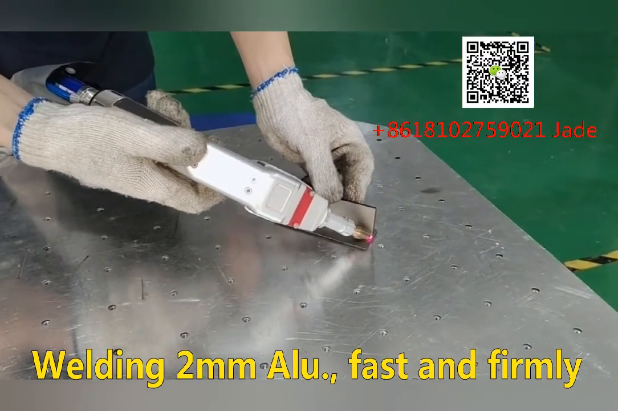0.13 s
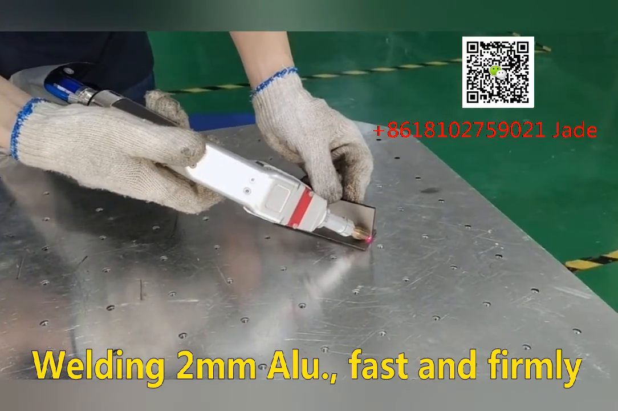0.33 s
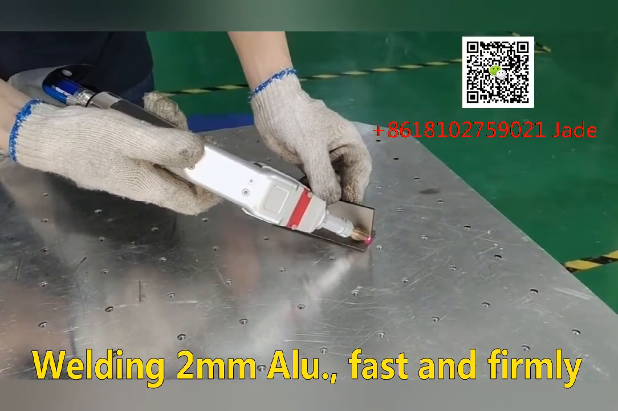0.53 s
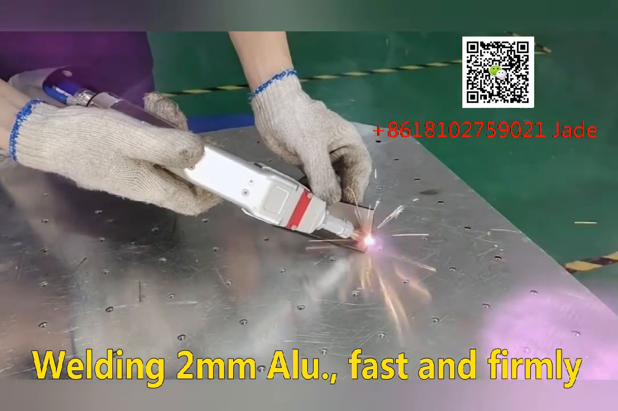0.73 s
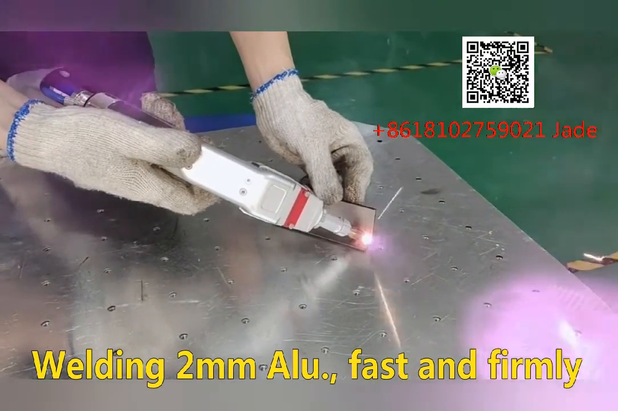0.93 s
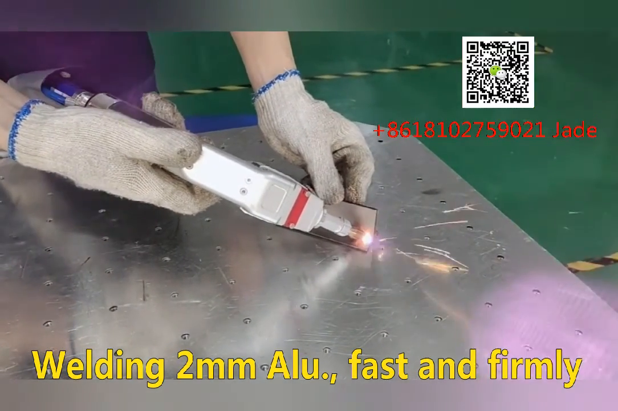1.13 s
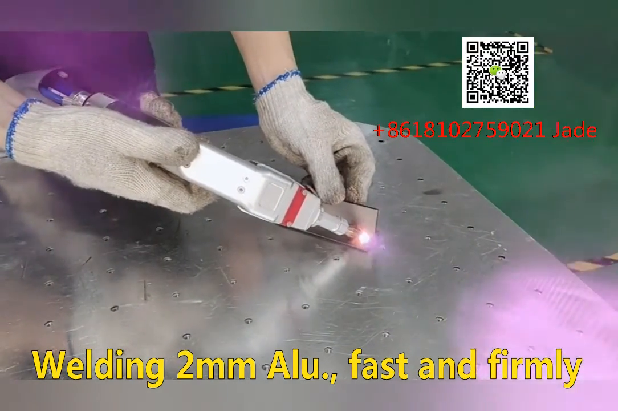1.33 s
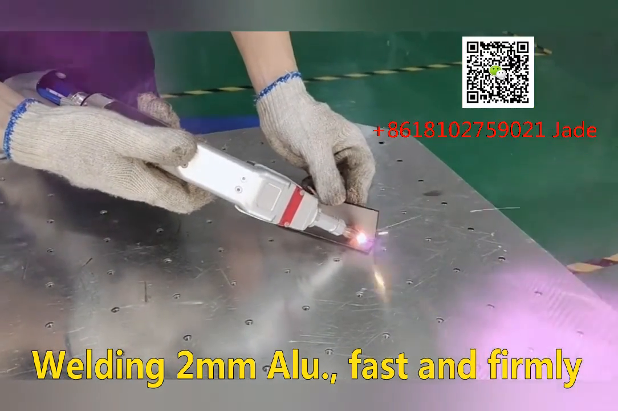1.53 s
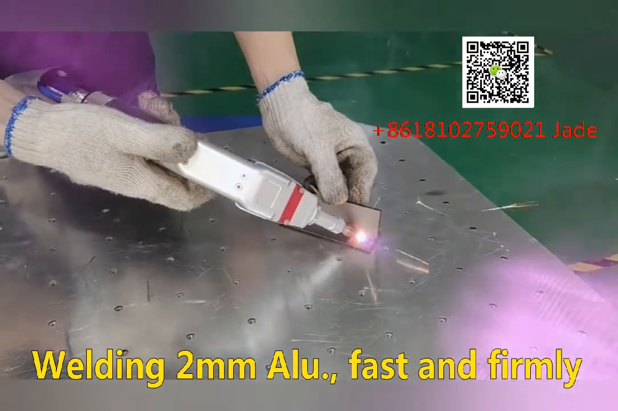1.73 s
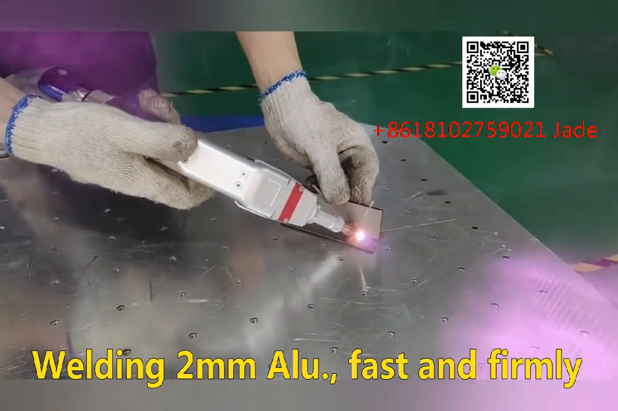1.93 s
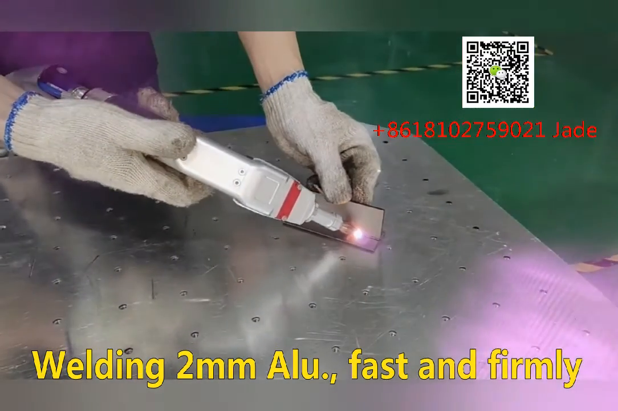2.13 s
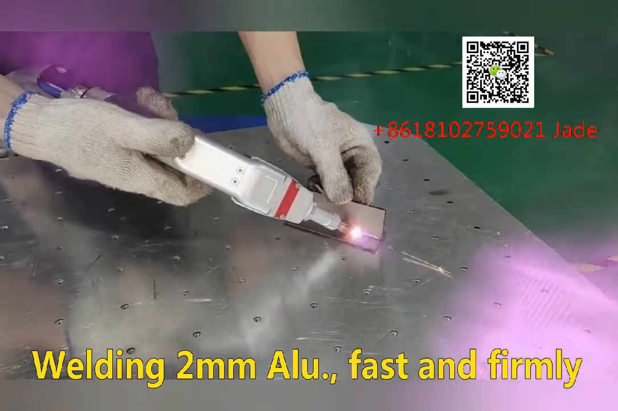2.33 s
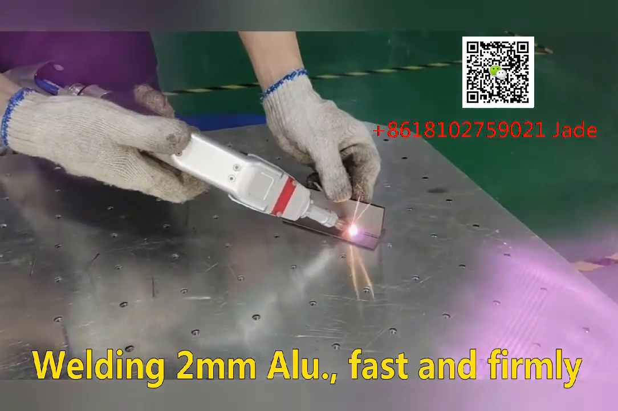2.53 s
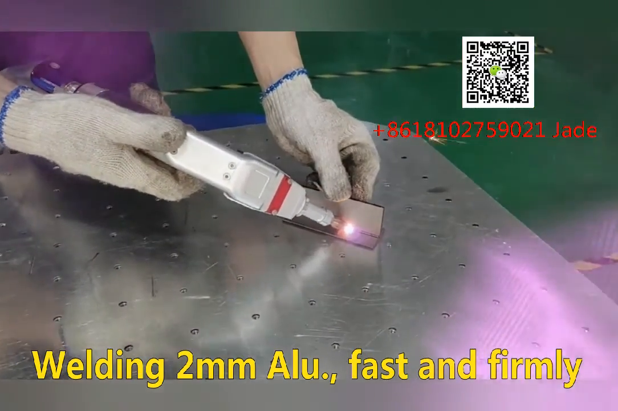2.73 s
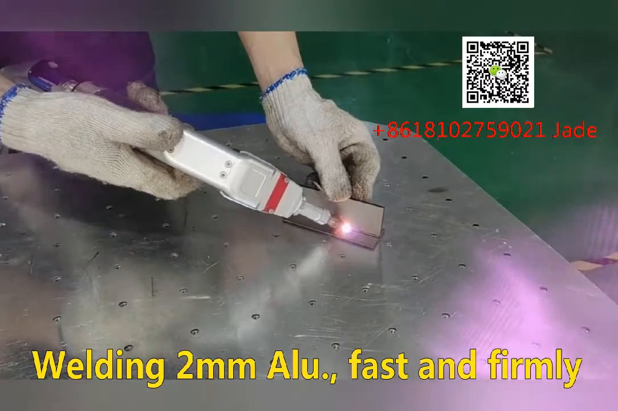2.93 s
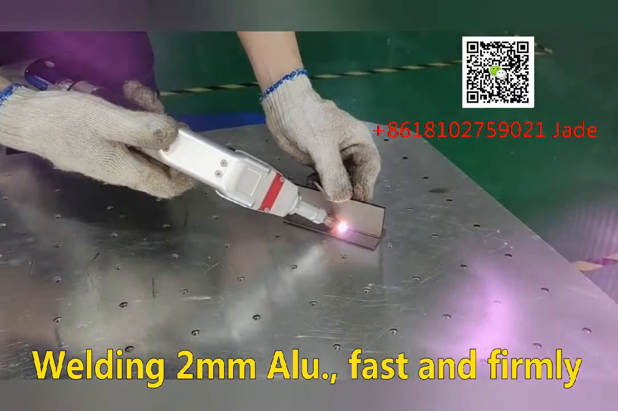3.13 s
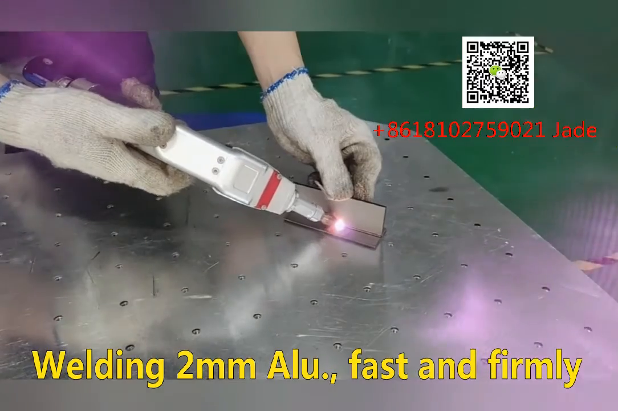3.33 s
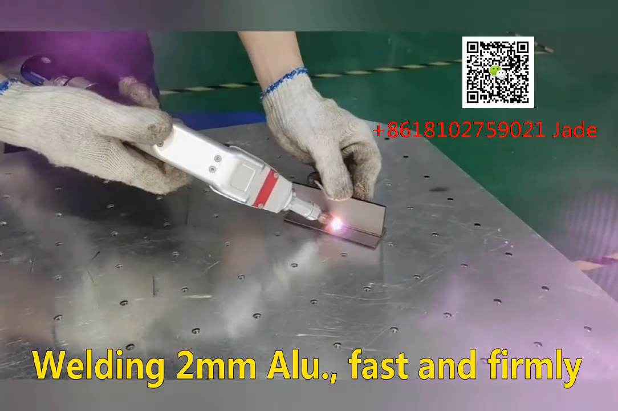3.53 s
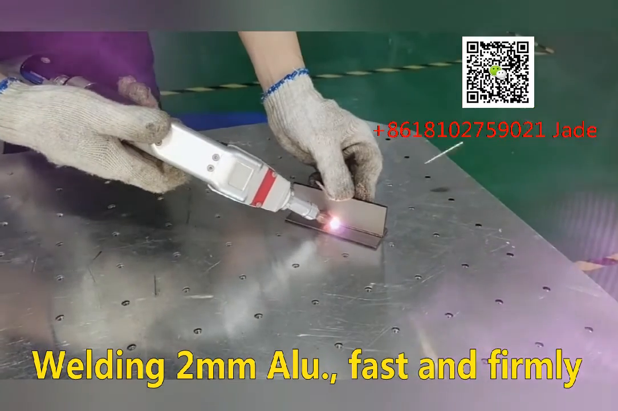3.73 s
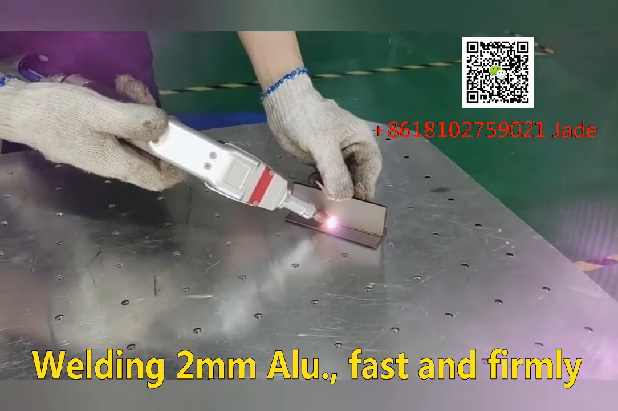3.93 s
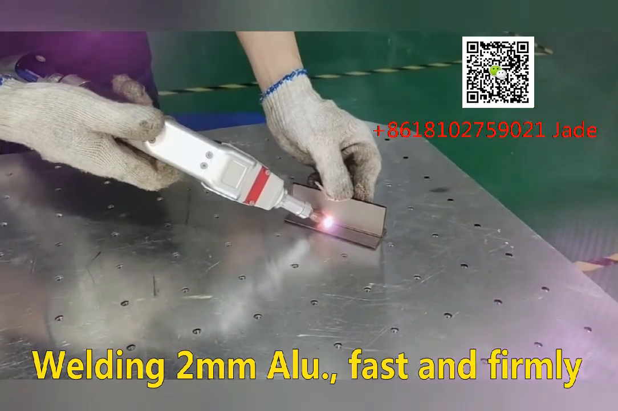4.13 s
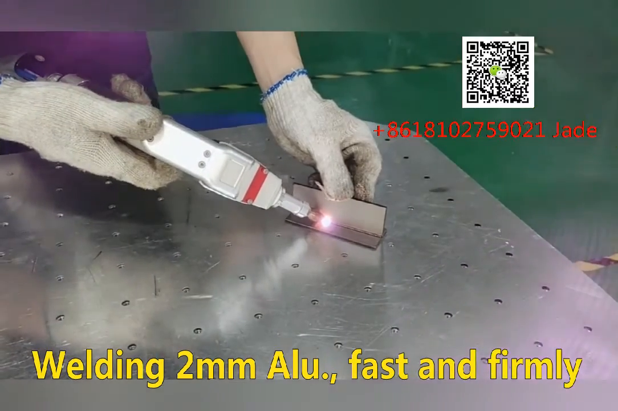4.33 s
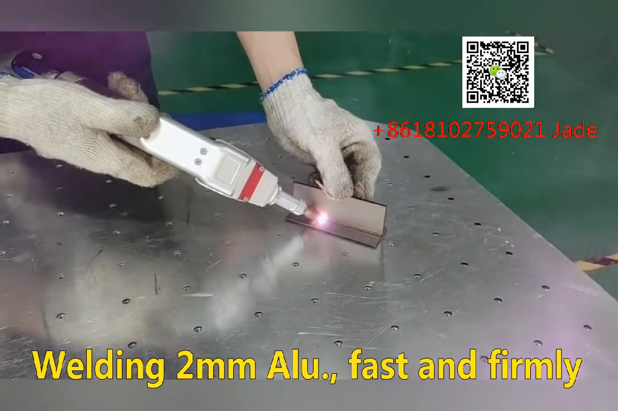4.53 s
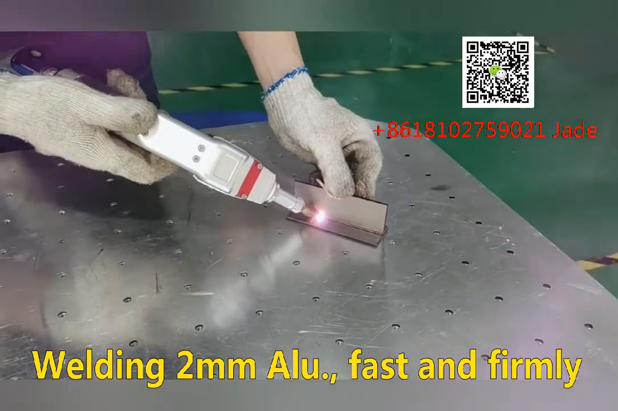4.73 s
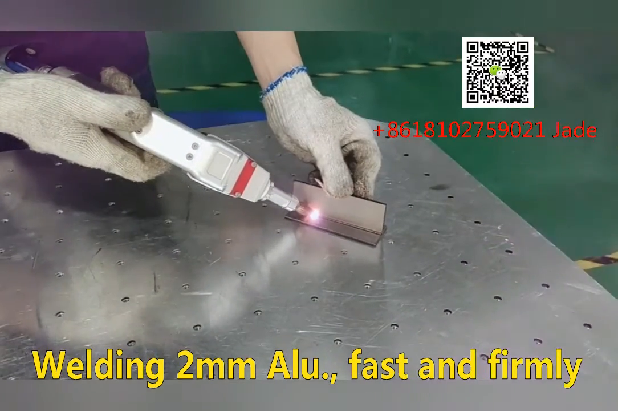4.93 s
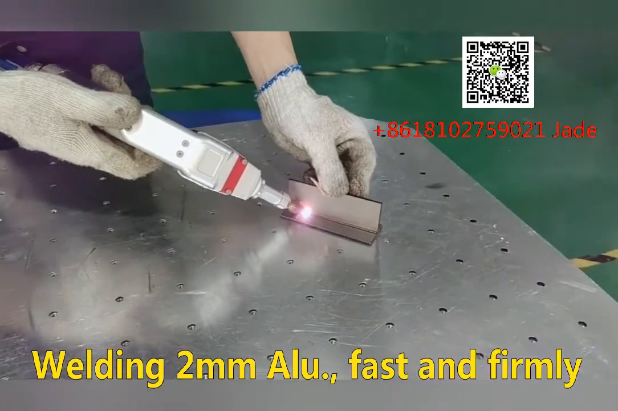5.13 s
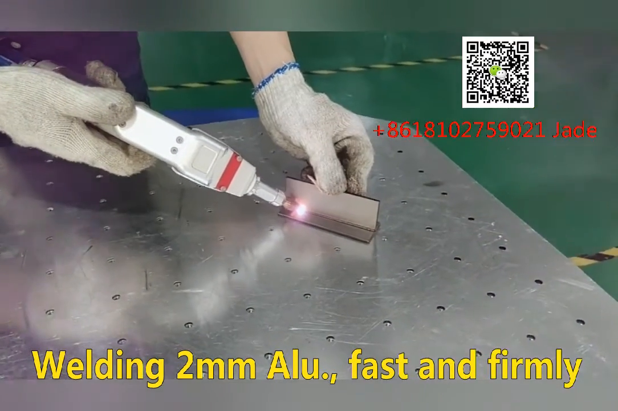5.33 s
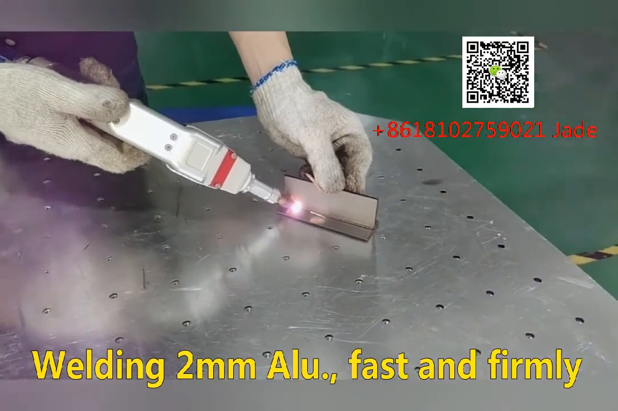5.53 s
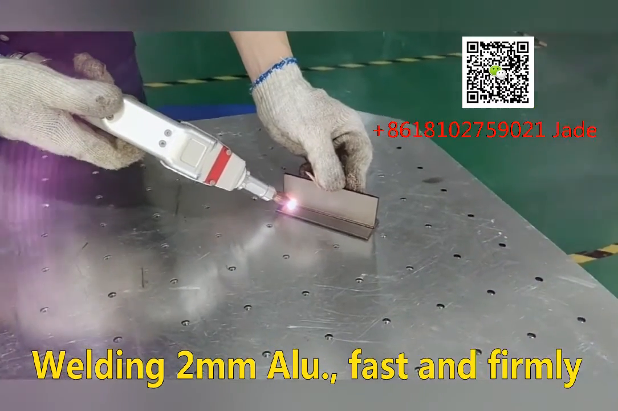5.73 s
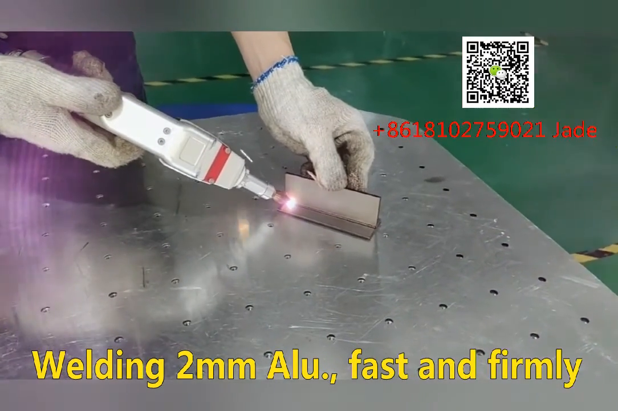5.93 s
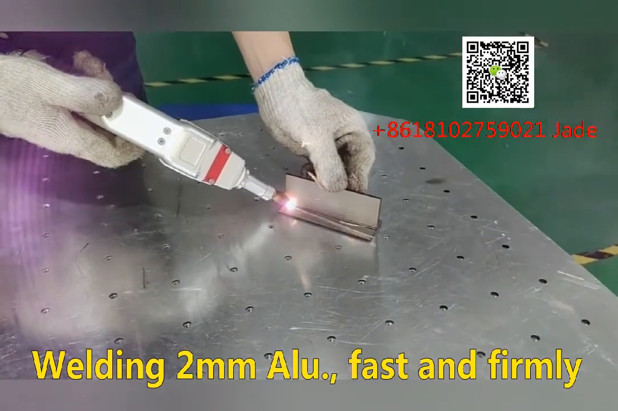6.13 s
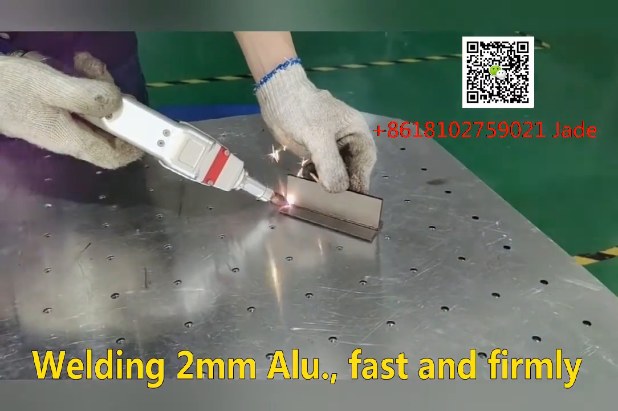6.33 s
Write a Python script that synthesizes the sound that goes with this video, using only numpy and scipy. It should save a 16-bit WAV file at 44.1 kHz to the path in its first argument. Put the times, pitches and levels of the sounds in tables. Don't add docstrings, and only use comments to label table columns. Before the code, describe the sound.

Close-up in a humming workshop with faint distant thuds. A valve snaps open and gas hisses through a small nozzle, then a relay ticks and a sharp crack starts the weld. A loud, bright, raspy hiss flutters about eighty times a second, with a thin high whistle inside. At the end a dull knock, a brief flare and freely blowing gas shudder on the steel table.

```python
import sys
import numpy as np
from scipy import signal
from scipy.fft import rfft, irfft, next_fast_len
from scipy.io import wavfile
from scipy.ndimage import uniform_filter1d, map_coordinates

SR = 44100
rng = np.random.default_rng(int(sys.argv[2]) if len(sys.argv) > 2 else 0)


def wav_record(signal):
    frames = np.transpose(np.atleast_2d(signal))
    bounded = np.clip(frames, -1, 1)
    quanta = np.round(bounded * 32767).astype(np.int16)
    wavfile.write(sys.argv[1], SR, quanta)


def convert_level_to_amplitude(level_db):
    exponent = np.asarray(level_db, float) / 20
    return 10 ** exponent


N = 281562
TIME = np.arange(N) / SR
SIZE = next_fast_len(N + 4096)
HZ = np.maximum(np.fft.rfftfreq(SIZE, 1 / SR), 1)

STRIKE_S = 0.5555
SHIELDED_S = 0.11
LULL_S, LULL_WIDTH_S = 6.01, 0.14
LIFT_S, LIFT_TAKES_S = 6.218, 0.0054


def rms_one(x):
    return x / np.sqrt(np.mean(x ** 2) + 1e-20)


def in_time(rows):
    s, *columns = np.transpose(rows)
    return [np.interp(TIME, s, c) for c in columns]


def at_hz(points, hz=HZ):
    points = np.array(points)
    return np.interp(np.log(hz), np.log(points[:, 0]), points[:, 1])


def shape(x, response):
    return irfft(rfft(x, SIZE) * response, SIZE)[..., :N]


def step(s, takes):
    return 0.5 + 0.5 * np.tanh((TIME - s) / takes)


def since(s):
    return np.maximum(TIME - s, 0)


def drift(rate):
    r = np.exp(-40 * np.pi * rate / SR)
    noise = rng.standard_normal(N // 20 + 2002)
    slow = signal.lfilter([1], [1, -2 * r, r * r], noise)[2000:]
    return np.interp(np.arange(N) / 20, np.arange(len(slow)), rms_one(slow))


def warble(hz, width_hz, steady=0):
    turn = 2 * np.pi * np.cumsum(hz * np.ones(N)) / SR
    tone = (steady + drift(width_hz)) * np.cos(turn) + drift(width_hz) * np.sin(turn)
    return tone / np.sqrt(1 + steady ** 2 / 2)


# (frequency [Hz], level [dB])
LEFT_PORT = [(890, -27.5), (1130, -21), (1650, -19.5), (1850, -16.5), (3300, -7.5), (4500, -1), (5200, -5),
             (5600, -9.5), (6400, -14.5), (7400, -22.5), (8500, -34), (10050, -29), (11000, -12),
             (15300, -12.5)]
RIGHT_PORT = [(890, -28), (1130, -21), (1650, -22.5), (1850, -14), (2800, -13.5), (3400, -15), (5400, -16),
              (6100, -6.5), (6450, -0.5), (7000, -6.5), (8200, -10.5), (12500, -8.5), (13900, -9),
              (14900, -6.5)]
# (frequency [Hz], lead [rad])
LEAD = [(0, -0.5), (2840, 0.5), (3100, 0), (3450, 6), (3700, 5), (5340, 3), (6370, 2.5), (8010, 2.5),
        (8960, 3.5), (9650, 3.2), (11600, -1.2), (12100, -1.5), (14600, -1), (16400, 7)]
# (delay [s], level [dB])
TABLE_ECHO = [(.000976, -14), (.000976, -10)]


def ports():
    fold = irfft(np.log(convert_level_to_amplitude(at_hz(LEFT_PORT))), SIZE)
    fold[SIZE // 2:] = 0
    phase = 2 * rfft(fold).imag
    lead = np.interp(HZ, *np.transpose(LEAD))
    sheen = 1 / (1 + (7000 / HZ) ** 4)
    echo = [1 - sheen * convert_level_to_amplitude(db) * np.exp(-2j * np.pi * HZ * s) for s, db in TABLE_ECHO]
    rumble_cut = np.minimum(HZ / 700, 1) ** 2
    left = convert_level_to_amplitude(at_hz(LEFT_PORT)) * np.exp(1j * phase)
    right = convert_level_to_amplitude(at_hz(RIGHT_PORT)) * np.exp(1j * (phase - lead))
    return np.array([left * echo[0], right * echo[1]]) * rumble_cut


PORTS = ports()

# (frequency [Hz], likeness [0-1])
ALIKE = [(900, 0.27), (1900, 0.93), (2600, 0.95), (3250, 0.38), (3700, 0.61), (5200, 0.28), (5900, 0.92),
         (6400, 0.74), (7700, 0.59), (11000, 0.16), (12000, 0.78), (13500, 0.39)]
# (time [s], extra lag of the left port [samples])
TRAVEL = [(.5, -0.31), (6.38, 1.75)]


def heard(direct, scattered, band):
    alike = np.clip(at_hz(ALIKE), 0, 1)
    left, right = PORTS * band
    lag, = in_time(TRAVEL)
    near = map_coordinates(shape(direct, right * alike), [np.arange(N) + lag], order=3)
    far = shape(scattered, right * np.sqrt(1 - alike ** 2))
    return np.array([shape(direct, left), near + far])


# (frequency [Hz], width [Hz], level [dB])
NOZZLE = [(2870, 250, 13), (4560, 590, 3.5), (6630, 400, 4), (9370, 200, 1), (11950, 660, -5)]


def nozzle():
    return 0.76 + sum(convert_level_to_amplitude(db) / (1 + 2j * (HZ - hz) / width) for hz, width, db in NOZZLE)


# (time [s], level [dB])
THUDS = [(.39, -39.5), (.66, -43), (.92, -40.5), (1.25, -39.5), (1.76, -43.5), (2.04, -47.5), (2.31, -49),
         (2.62, -46), (2.77, -41.5), (3.13, -45.5), (3.55, -45), (3.93, -46), (4.45, -47.5), (4.86, -41),
         (5.62, -42.5), (6.06, -49)]


def shop_level():
    rise_s, fall_db_per_s = 0.02, 43.5
    s, db = np.transpose(THUDS)[:, :, None]
    after = TIME[::64] - s
    swell = np.exp(-(np.minimum(after, 0) / rise_s) ** 2)
    thuds = convert_level_to_amplitude(2 * (db - fall_db_per_s * np.maximum(after, 0))) * swell
    power = np.interp(TIME, TIME[::64], thuds.sum(axis=0))
    floor_db = -48 - 2 * step(STRIKE_S, SHIELDED_S)
    return 10 * np.log10(power + convert_level_to_amplitude(2 * floor_db))


def mottled(x):
    murmur_db, murmur_hz = 3, 7.3
    tops = [1 / (1 + (HZ / hz) ** 8) for hz in (300, 900, 1600, 2600)] + [1]
    spectrum = rfft(x, SIZE)
    out = 0
    for below, top in zip([0] + tops, tops):
        band = irfft(spectrum * (top - below), SIZE)[:, :N]
        out = out + band * convert_level_to_amplitude(murmur_db * drift(murmur_hz))
    return out


# (frequency [Hz], level [dB per Hz])
SHOP_COLOUR = [(15, -50), (25, -16), (69, -6), (92, -7), (124, -32), (203, -4), (235, -9.5), (504, -8.5),
               (800, -13.5), (2160, -17.5), (5780, -29), (6530, -21.5), (9000, -53), (11700, -94),
               (19800, -120)]
# (frequency [Hz], likeness [0-1]; values below 0 count as 0)
SHOP_ALIKE = [(30, .85), (60, 0.94), (130, .98), (290, 0.75), (640, 0.3), (1410, -0.59), (3100, 0.27),
              (6820, 0.0053), (15000, 0.5)]
# (frequency [Hz], width [Hz], level [dB])
HUM = [(100, 11.6, -56), (163.6, 25, -55), (202.3, 10, -55), (300, 13, -63.5), (328.6, 17, -62.5),
       (412, 22, -63.5), (664, 13, -67), (793, 17, -65.5)]
# (frequency [Hz], level [dB])
WHINE = [(2202, -71.5), (6358, -78), (6605, -60), (8807, -79), (10029, -85), (10761, -67), (11499, -80),
         (12231, -77), (12473, -90), (12963, -70), (13695, -88), (14433, -63)]


def shop():
    alike = np.clip(at_hz(SHOP_ALIKE), 0, 1)
    colour = convert_level_to_amplitude(at_hz(SHOP_COLOUR))
    mid, side = rng.standard_normal((2, N))
    mid = shape(mid, colour * np.sqrt(1 + alike))
    side = shape(side, colour * np.sqrt(1 - alike))
    rumble = rms_one(mottled(np.array([mid + side, mid - side]))) * convert_level_to_amplitude(-49.5)
    hum = sum(convert_level_to_amplitude(db) * warble(hz, width) for hz, width, db in HUM)
    hum = hum + 0.04 * np.roll(hum, N // 2) * [[1], [-1]]
    whine = 0
    for hz, db in WHINE:
        pan_db = (at_hz(LEFT_PORT, hz) - at_hz(RIGHT_PORT, hz)) * np.array([[0.6], [-0.1]])
        whine = whine + convert_level_to_amplitude(db + 4.0 + pan_db) * np.sin(2 * np.pi * hz * TIME)
    return (rumble + hum) * convert_level_to_amplitude(shop_level() + 47.5) + whine


LEAK_S = 0.335


def gas_levels():
    open_s, fills_s, seat_clears_s = 0.368, 0.053, 0.0056
    lifted = step(LIFT_S, LIFT_TAKES_S)
    shielded = (1 - np.exp(-since(STRIKE_S) / SHIELDED_S)) * (1 - lifted)
    seat = np.exp(-since(open_s) / seat_clears_s)
    leak_db = -71 + 543 * since(LEAK_S)
    flow_db = -27 - 11.5 * np.exp(-since(open_s) / fills_s) - 24 * seat
    level_db = np.where(TIME < open_s, leak_db, flow_db - 2.5 * shielded - 1 * lifted)
    treble_db = 17 * seat + 2.5 * shielded + 1 * lifted
    bass_db = lifted * (15.5 - 29 * since(LIFT_S))
    return level_db, treble_db, bass_db


def purge():
    gas = heard(*rng.standard_normal((2, N)), nozzle() * (HZ / 5000) ** 0.2)
    level_db, treble_db, bass_db = gas_levels()
    treble = shape(gas, 1 / (1 + (7000 / HZ) ** 8))
    bass = shape(gas, 1 / (1 + (HZ / 2300) ** 8))
    tilted = gas + treble * (convert_level_to_amplitude(treble_db) - 1) + bass * (convert_level_to_amplitude(bass_db) - 1)
    return tilted / gas.mean(axis=0).std() * convert_level_to_amplitude(level_db) * (TIME > LEAK_S)


# (time [s], peak level [dB], knock against tick [dB], knock frequency [Hz])
CLICKS = [
    (.346, -40, -30, 540),
    (0.369, -38, -8, 540),
    (.384, -13.5, -12.5, 550),
    (0.517, -15, -33, 540),
    (0.5557, -8, -15, 1710),
    (6.22, -29, 2, 168),
    (6.245, -13, -9, 1193),
]


def clicks():
    ticks, knocks, after = np.zeros(N), np.zeros(N + 8000), TIME[:8000]
    for s, peak_db, knock_db, hz in CLICKS:
        start = round(s * SR)
        ticks[start] = convert_level_to_amplitude(peak_db)
        fade = (1 - np.exp(-after * hz * 2)) * np.exp(-after * hz / 6.6)
        ring = fade * sum(np.sin(2 * np.pi * k * hz * after) for k in (0.8, 1.03, 1.27)) / 2
        knocks[start:start + 8000] += convert_level_to_amplitude(peak_db + knock_db) * ring[:len(knocks) - start]
    tick = heard(ticks, -ticks, nozzle() / (1 + (HZ / 6000) ** 4))
    loudest = convert_level_to_amplitude(np.max(np.array(CLICKS)[:, 1]))
    return tick * loudest / np.abs(tick.mean(axis=0)).max() + knocks[:N]


# (time [s], level [dB], frequency [Hz], decay [s])
PUFF = (.3655, -28, 7300, .012)


def puff():
    s, level_db, hz, decay = PUFF
    fade = np.exp(-np.clip(TIME - s, 0, 1) / decay) * (TIME > s)
    spit = rng.standard_normal((2, N)) * fade
    return shape(spit, 4.5 / (1 + ((HZ - hz) / 900) ** 2)) * convert_level_to_amplitude(level_db) * convert_level_to_amplitude([[-8], [4]])


FLARE_RISE_S, FLARE_END_S = 0.049, 6.328

# (time [s], level [dB])
PLUME = [(.55, -28.5), (.69, -18.5), (.8, -26), (1.0, -16.5), (1.26, -23), (1.5, -19.5), (2.12, -19.5),
         (2.22, -21.5), (2.5, -17), (2.6, -21.5), (2.88, -19.5), (3.5, -19), (4.17, -19), (4.37, -20),
         (4.87, -19), (5.4, -20.5), (5.68, -18), (6.09, -17.5)]


def beam_levels():
    lifted = step(LIFT_S, LIFT_TAKES_S / 2)
    flaring = (TIME > LIFT_S) & (TIME < FLARE_END_S)
    welding = since(STRIKE_S)
    weld_db = in_time(PLUME)[0] - 46 * since(PLUME[-1][0])
    climb = np.exp(-since(LIFT_S) / FLARE_RISE_S)
    flare_db = np.where(TIME < FLARE_END_S, -18.5 - 17 * climb, -30)
    surge_db = np.clip(weld_db + 20, -6, 6)
    jet_db = -8.5 + 10 * np.exp(-welding / 1.42) + 0.81 * welding - 0.1 * surge_db
    free_jet_db = -5.5 + 7.5 * (1 - climb) * flaring
    roar_db = -13 - 0.84 * welding - 0.36 * surge_db + 5 * step(LULL_S, LULL_WIDTH_S)
    pairs = [(weld_db, flare_db), (jet_db, free_jet_db), (roar_db, -8.5)]
    return [(1 - lifted) * on_seam + lifted * off_seam for on_seam, off_seam in pairs]


def burst_level():
    lull_db = -11 * np.exp(-((TIME - LULL_S) / LULL_WIDTH_S) ** 2)
    weld_db = 3 + 1.74 * since(STRIKE_S) + lull_db
    return np.where(TIME < LIFT_S, weld_db - 35 * since(PLUME[-1][0]), -2.5)


LUCK = np.clip(rng.standard_normal((520, 2)), -2, 2)


def swing(depth, rise=0.069, fall=0.15, spread_db=1.5, jitter=0.042):
    swing_hz, first_s = 79.93, 0.29
    turns = TIME * swing_hz + 0.5 - first_s
    luck = LUCK[turns.astype(int)]
    past = turns % 1 - 0.5 - jitter * luck[:, 1]
    hump = np.where(past < 0, np.exp(-(past / rise) ** 2), np.exp(-past / fall))
    power = 1 + depth * convert_level_to_amplitude(2 * (burst_level() + spread_db * luck[:, 0])) * hump
    return np.sqrt(power / uniform_filter1d(power, size=5520))


def torch():
    plume_db, jet_db, roar_db = beam_levels()
    low = 1 / (1 + (HZ / 2300) ** 8)
    high = 1 / (1 + (7650 / HZ) ** 16)
    common, out = drift(10.4), 0
    for band, rel_db, depth in [(low, roar_db, 0.45), (1 - low - high, 0, 1.05), (high, jet_db, 0.45)]:
        flicker = convert_level_to_amplitude(1.0 * common + 0.46 * drift(21))
        noise = rng.standard_normal((2, N)) * swing(depth) * flicker
        part = heard(*noise, np.sqrt(np.clip(band, 0, 1)))
        rms = np.sqrt(np.mean(part.mean(axis=0) ** 2))
        out = out + part / rms * convert_level_to_amplitude(plume_db + rel_db)
    return out * (TIME > STRIKE_S)


# (time [s], level [dB])
SINGING = [
    (.56, -32),
    (.75, -31.5),
    (2.0, -33),
    (4.5, -29),
    (5.3, -31),
    (5.8, -36),
    (6.15, -34.5),
    (6.2, -24.5),
    (6.38, -25.5),
]


def whistle():
    level_db, = in_time(SINGING)
    hz = 3032 - 240 * np.exp(-since(STRIKE_S) / 0.095) + 5 * since(STRIKE_S)
    hz = hz + 150.6 * step(LIFT_S, 2 * LIFT_TAKES_S)
    flare = np.exp(-((TIME - FLARE_END_S + FLARE_RISE_S / 2) / FLARE_RISE_S) ** 2)
    hz = hz - 72 * flare + 14 * drift(40.7)
    tone = warble(hz, width_hz=50, steady=5.5)
    tone = tone * swing(0.59) * convert_level_to_amplitude(level_db) * convert_level_to_amplitude([[2.5], [-3]])
    octave = warble(2.012 * hz, width_hz=51, steady=1.5)
    octave = octave * convert_level_to_amplitude(2 * level_db + 18) * convert_level_to_amplitude([[-8], [4]])
    return (tone + octave) * (TIME > SINGING[0][0])


def blown():
    low_hz, high_hz = 95, 390
    band = 1 / np.sqrt((1 + (low_hz / HZ) ** 4) * (1 + (HZ / high_hz) ** 8))
    mid, side = shape(rng.standard_normal((2, N)), band)
    level_db = -38.5 + 8 * np.exp(-since(LIFT_S) / 0.04) + 2.0 * drift(25)
    shudder = rms_one(mid + 0.15 * side * [[1], [-1]])
    return shudder * convert_level_to_amplitude(level_db) * step(LIFT_S, LIFT_TAKES_S / 2)


def scene():
    return shop() + purge() + clicks() + puff() + torch() + whistle() + blown()


def drop_faint(x):
    hz, _, z = signal.stft(x, SR, nperseg=2048, noverlap=1024)
    edges = np.r_[np.arange(32, 80, 4), np.arange(80, 128, 8), np.arange(128, 736, 16)]
    width = np.diff(np.r_[edges, len(hz)])[:, None]
    band = np.clip(np.searchsorted(edges, np.arange(len(hz)), "right") - 1, 0, None)

    def power_of(v):
        return np.add.reduceat(np.abs(v) ** 2, edges, axis=1) / width

    turn = np.array([[1, 0.98], [1, -1.008]]) / np.sqrt(2)
    pair = np.einsum("ab,bft->aft", turn, z)
    power = power_of(pair)
    strong = power > power[::-1] * convert_level_to_amplitude([[[-20]], [[-27]]])
    pair = pair * np.where(hz[:, None] < 700, 1, strong[:, band])
    z = np.einsum("ab,bft->aft", turn, pair)
    power = power_of(z)
    limit_db = -31.5 + 3 * rng.standard_normal(strong.shape)
    limit = power.max(axis=1, keepdims=True) * convert_level_to_amplitude(2 * limit_db)
    keep = np.where(hz[:, None] < 775, 1, (power > limit)[:, band])
    wander = np.round(rng.normal(0, [[[1.1]], [[0.7]]], (2, 1, z.shape[2])))
    top_hz = np.array([15170, 15600])[:, None, None] + 86 * wander
    z = z * keep * (hz[:, None] < top_hz)
    return signal.istft(z, SR, nperseg=2048, noverlap=1024)[1][:, :N]


def low_pass(x):
    return signal.sosfilt(signal.butter(12, 16800, fs=SR, output="sos"), x)


def record(dry):
    rounded = 1.12 * np.tanh(dry / 1.12)
    mix = drop_faint(rounded)
    return low_pass(mix)


dry = scene()
out = record(dry)
wav_record(out)
```